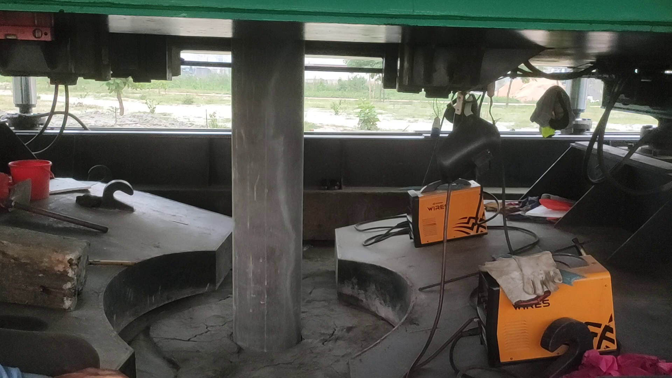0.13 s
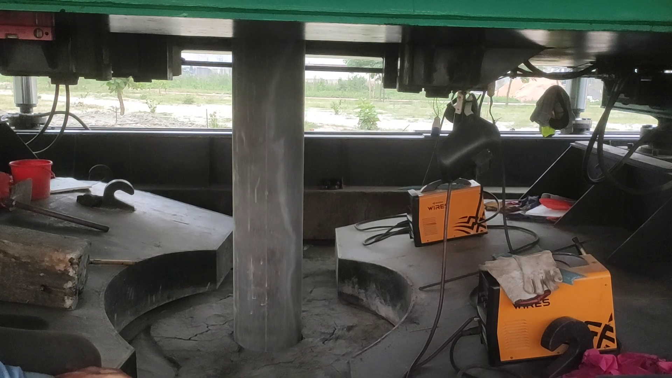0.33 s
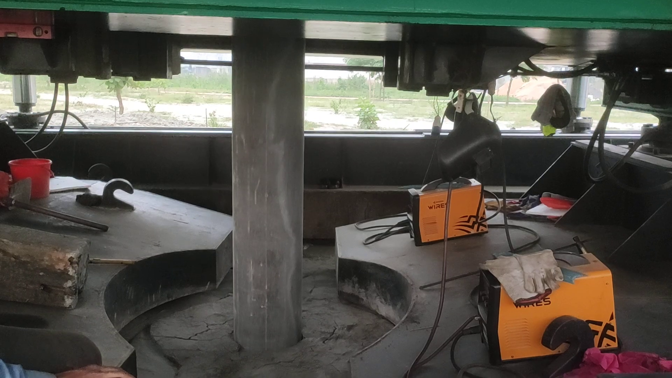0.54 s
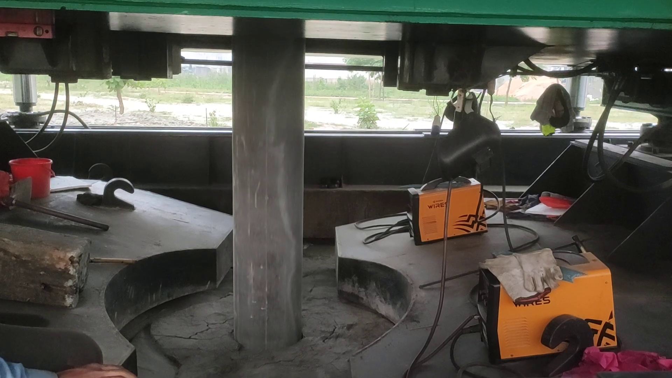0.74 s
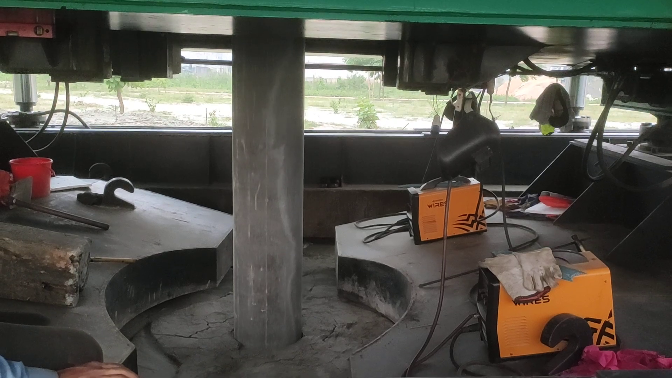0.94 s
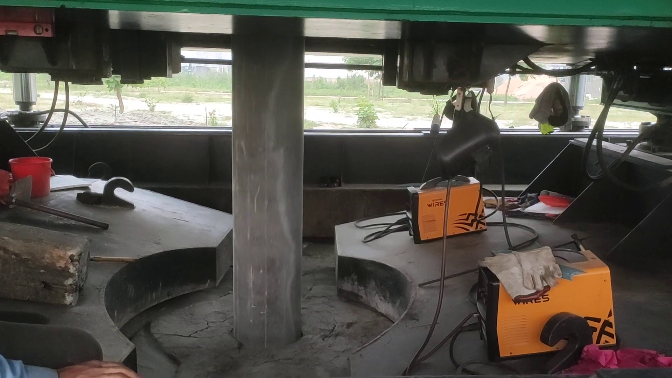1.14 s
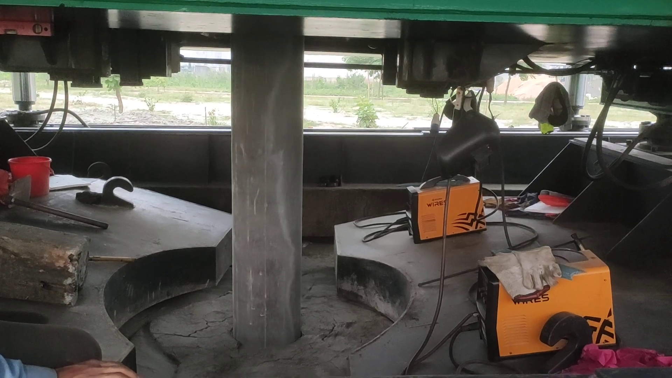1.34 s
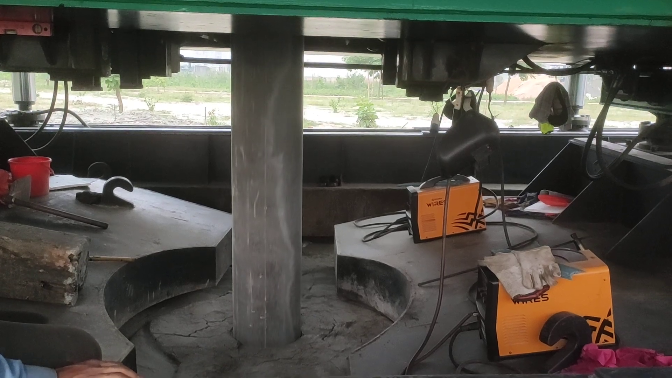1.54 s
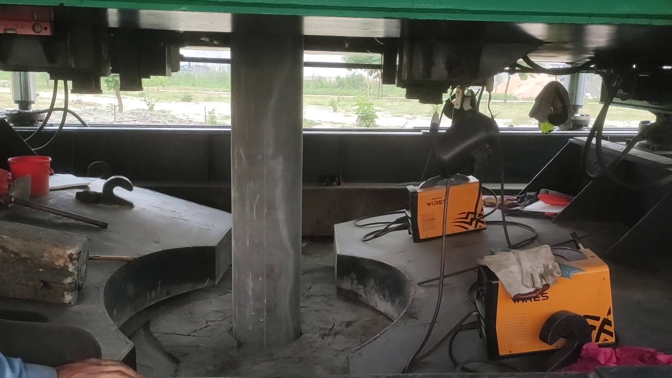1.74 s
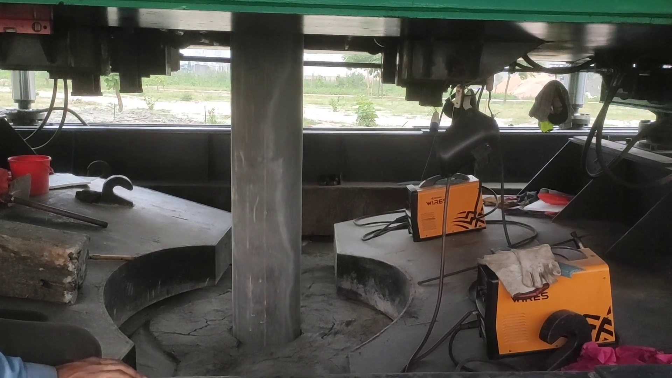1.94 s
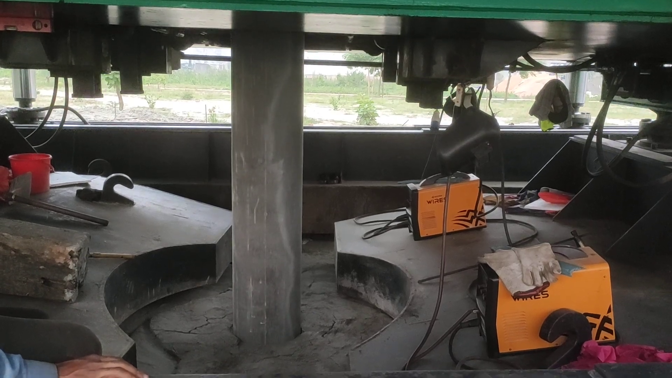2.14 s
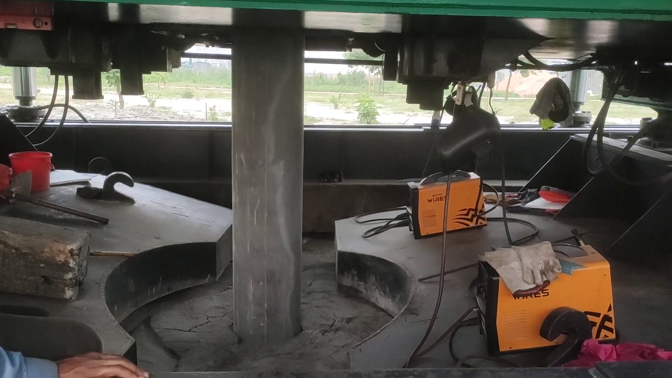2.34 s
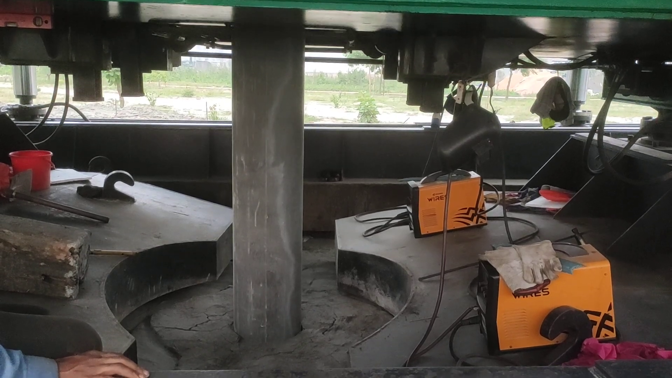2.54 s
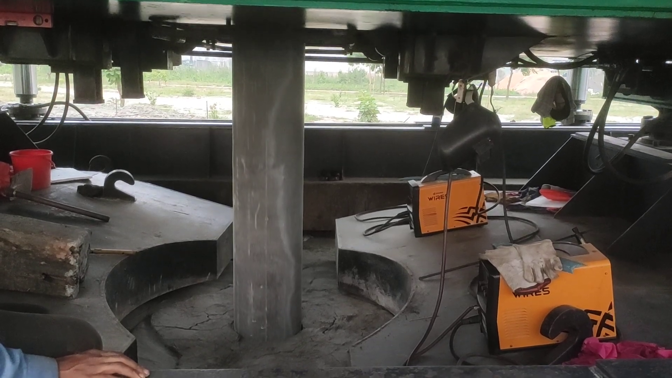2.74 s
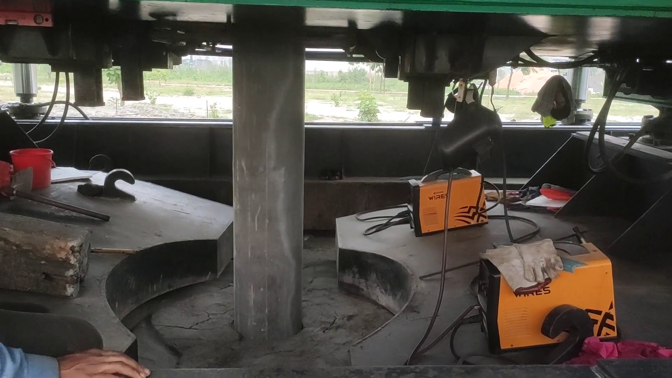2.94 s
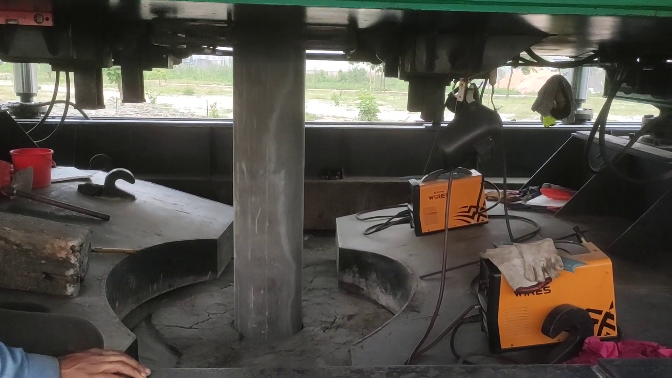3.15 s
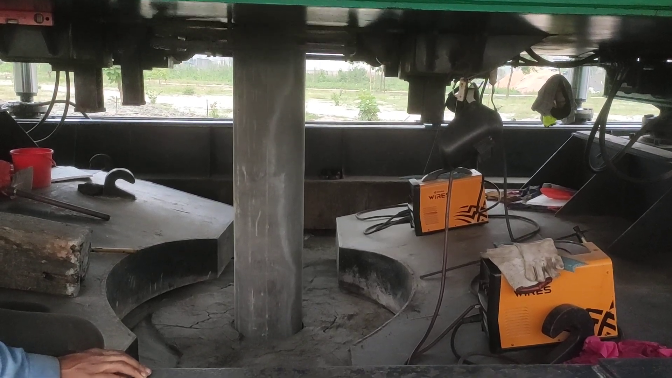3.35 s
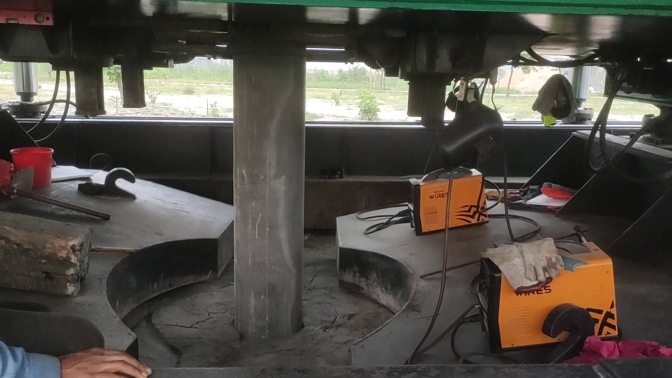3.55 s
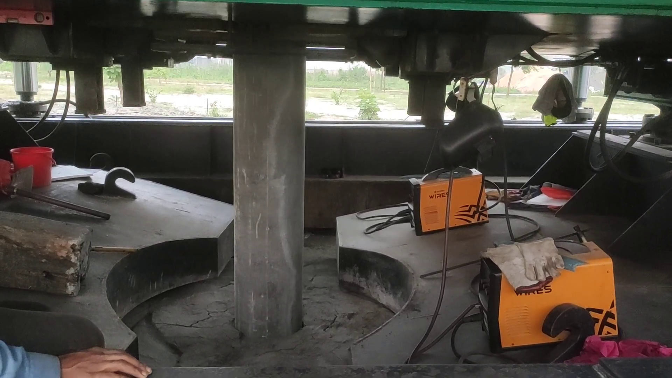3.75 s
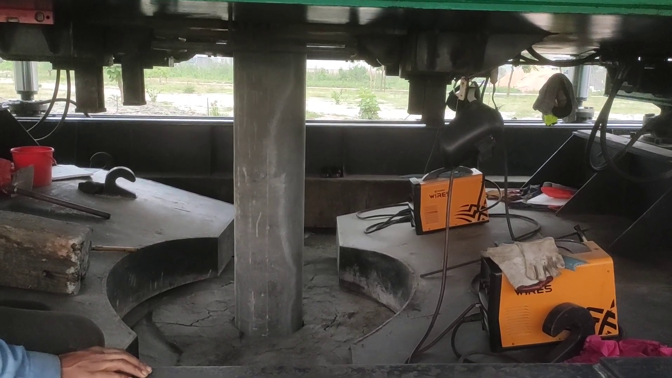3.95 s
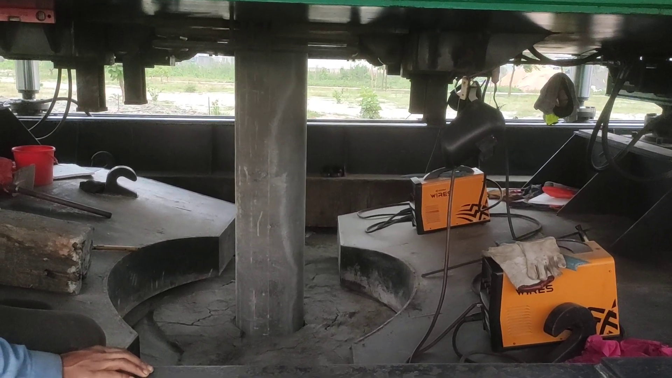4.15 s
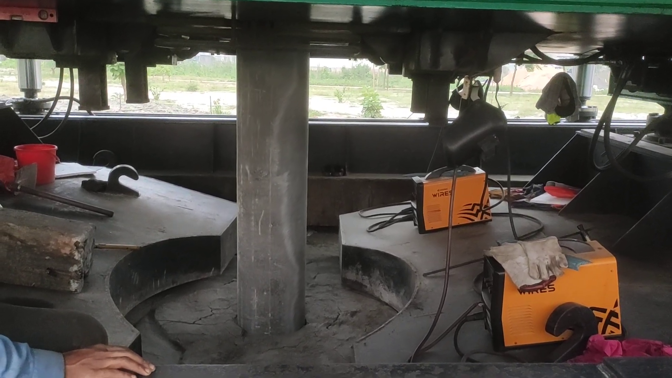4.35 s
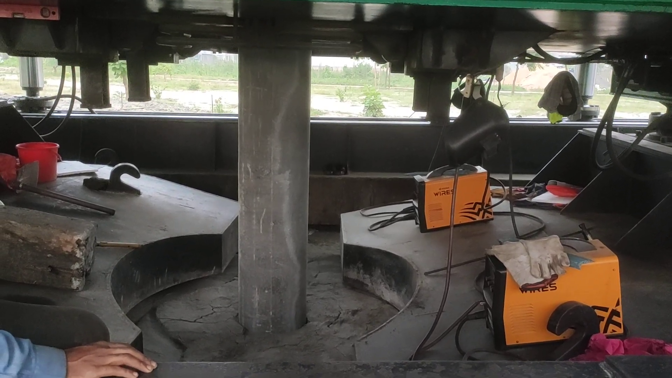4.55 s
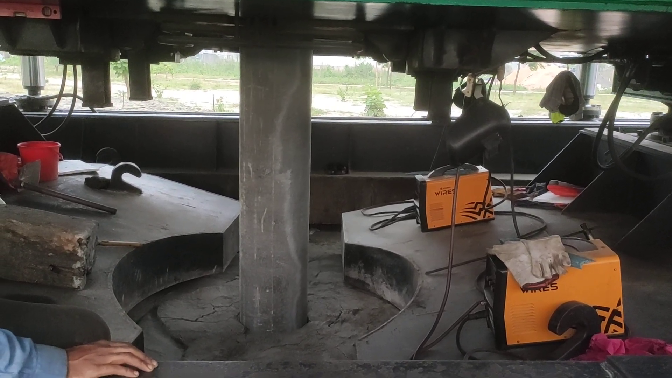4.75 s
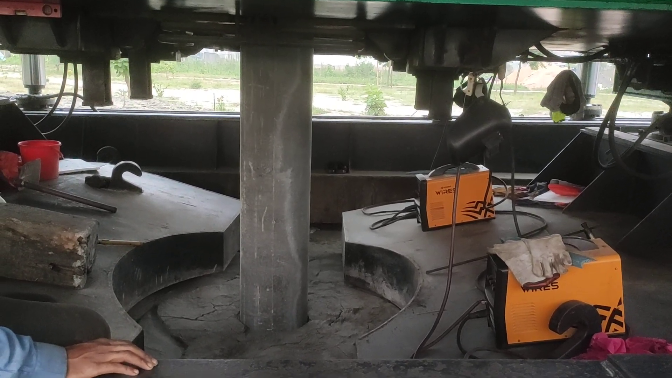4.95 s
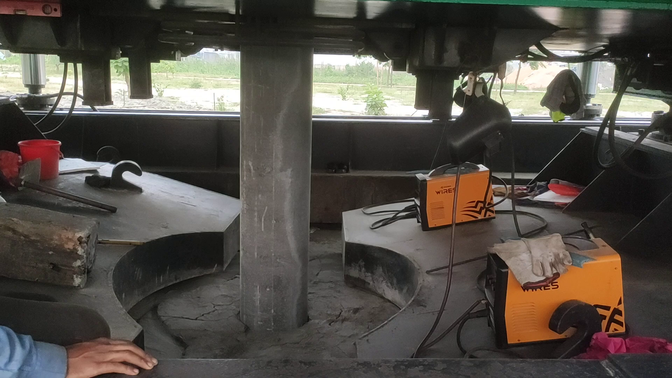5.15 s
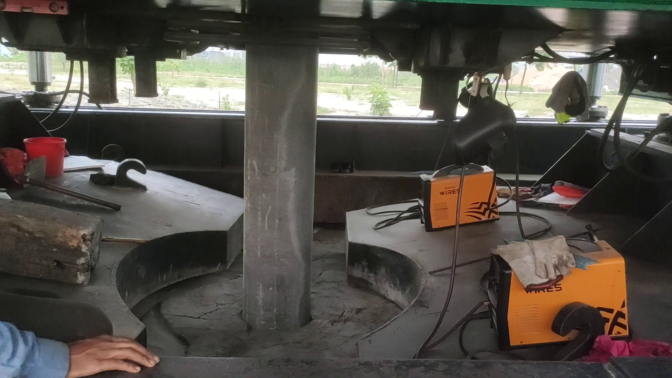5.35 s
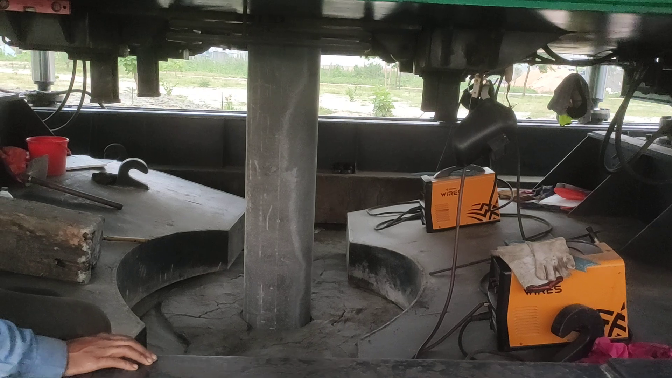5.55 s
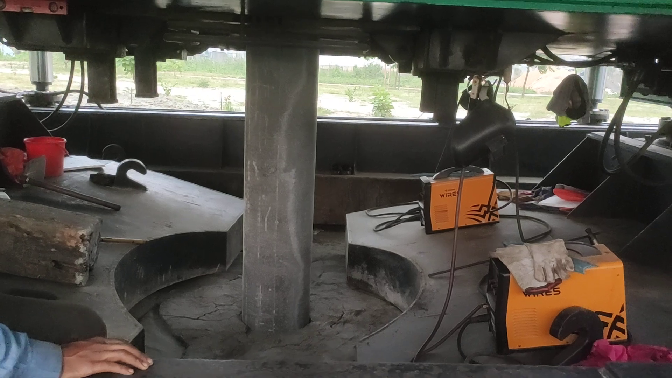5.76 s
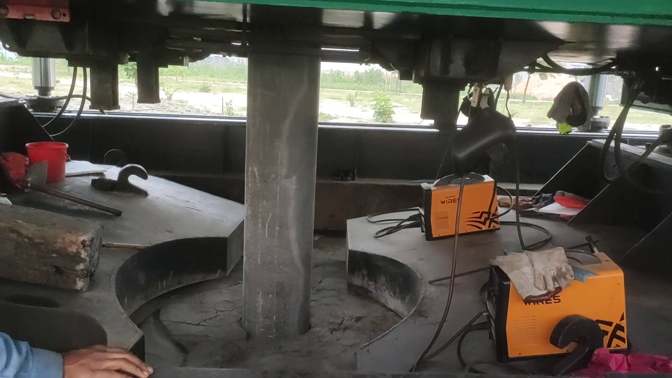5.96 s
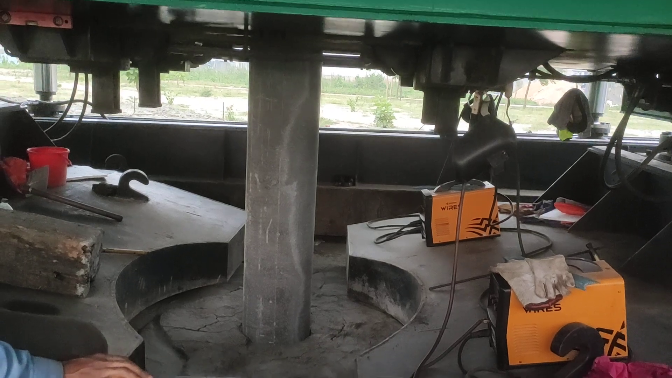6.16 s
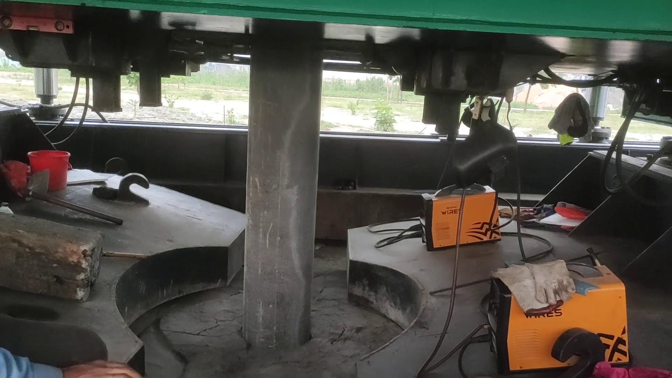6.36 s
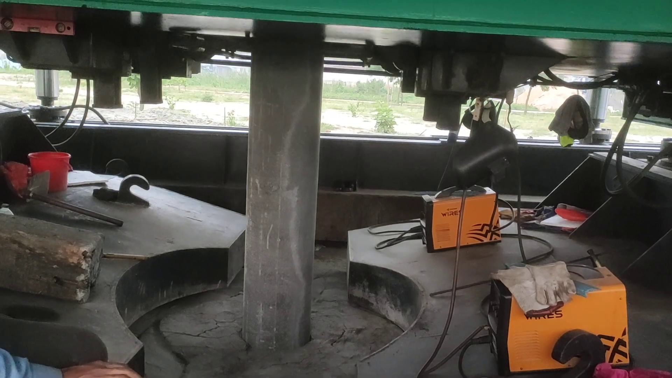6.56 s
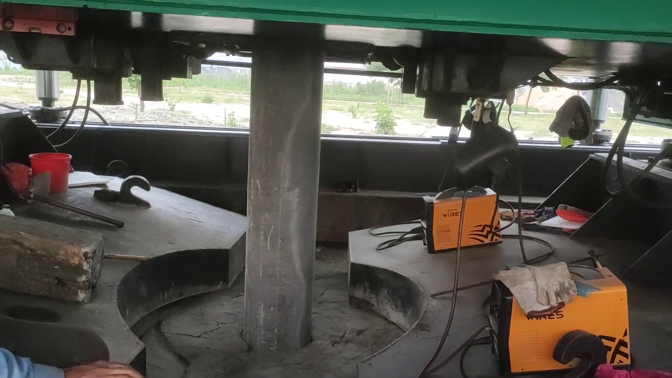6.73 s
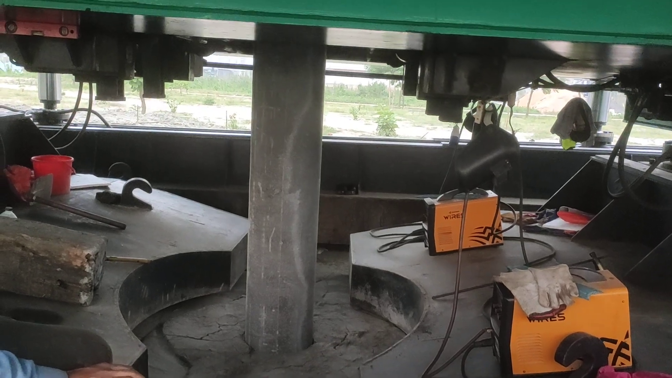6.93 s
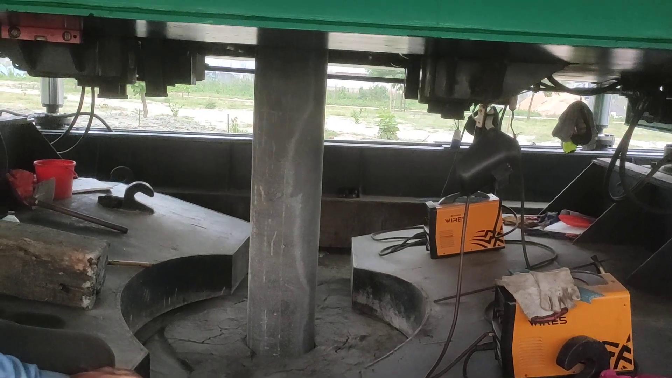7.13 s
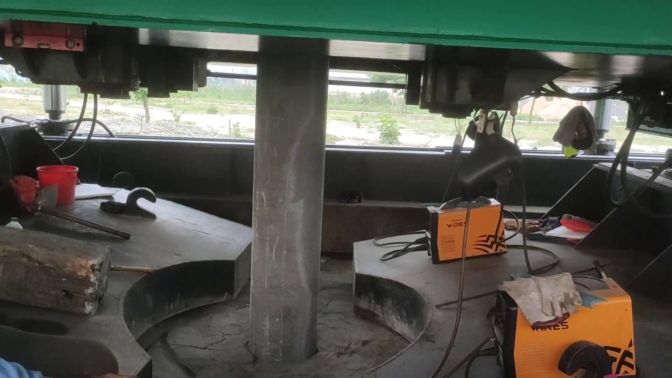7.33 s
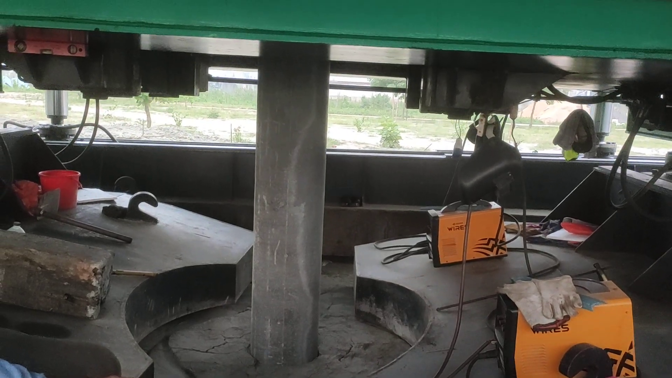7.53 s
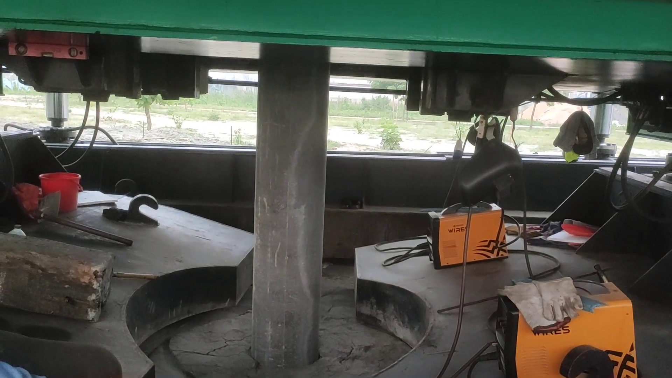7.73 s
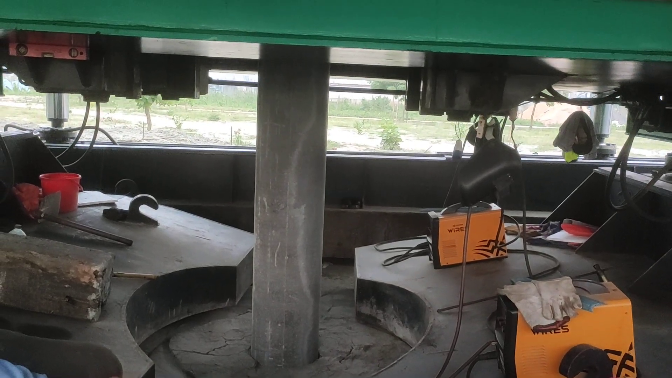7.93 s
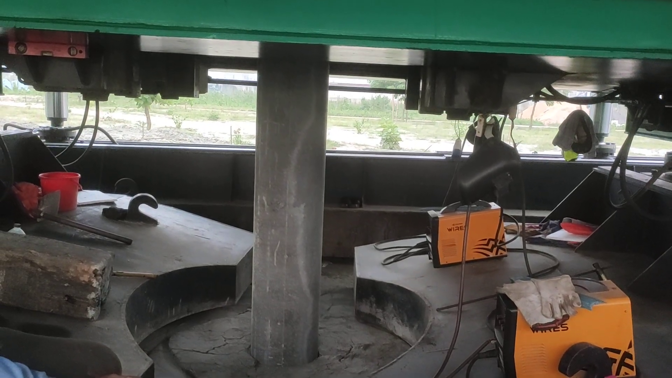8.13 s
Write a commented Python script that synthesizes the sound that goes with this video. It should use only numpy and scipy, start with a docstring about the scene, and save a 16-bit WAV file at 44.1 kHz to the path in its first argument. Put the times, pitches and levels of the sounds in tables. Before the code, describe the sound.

Close under a steel deck, a hydraulic machine hums loud and steady, diesel clatter and rushing oil beneath it. Midway a hard booming clank shakes the frame and the hum drops back, wavering. Later come a shrill squeak, a short grinding groan, a few knocks and thuds while the pitch hunts; then the hum settles again. Steady microphone hiss throughout.

```python
"""Hydraulic pile press under load

Heard under the steel deck: the piston pumps hum as harmonics of their stroke rate, which swell and fade.
The diesel engine repeats one uneven clatter every turn of the shaft; oil rushes and hisses as coloured noise.
Midway the load shifts: the shared speed hunts, the oil surges, and decaying modes and noise jolt the frame.
The pile grinds in runs of ringing slips, grit crumbles, steel squeaks and knocks; then the hum settles.
A steady microphone hiss lies under it all."""
import sys
import numpy as np
from scipy import signal
from scipy.fft import rfft, irfft, next_fast_len
from scipy.io import wavfile
from scipy.ndimage import uniform_filter1d, minimum_filter1d

SR = 44100
rng = np.random.default_rng(int(sys.argv[2]) if len(sys.argv) > 2 else 0)


def to_wav(sig):
    """Store sig (one row per channel, or 1-D mono) as 16-bit WAV at the path in sys.argv[1].

    Samples outside -1..1 are clipped; the rate is SR.
    """
    pcm = np.clip(np.atleast_2d(sig), -1, 1) * 32767
    pcm = np.round(pcm).astype(np.int16)
    wavfile.write(sys.argv[1], SR, pcm.T)  # frames by channels


N = 365588
START_S, EDGE_HZ = 0.338, 15000  # sound starts; upper band limit
PISTONS = 7  # strokes per turn of the shaft
# load drops off, load comes back, engine stops hunting; each change takes SHIFT_S
SLACK_FROM_S, SLACK_TO_S, SETTLE_S, SHIFT_S = 3.63, 5.246, 6.91, 0.29

# Pump speed. Each row: time in seconds, piston strokes per second.
STROKE_RATE = [(0.34, 173.7), (3.62, 173.5), (3.7, 172.3), (3.75, 175), (3.825, 182), (3.89, 176.5),
               (3.97, 174.6), (4.15, 174.5), (4.3, 176.3), (4.48, 175.3), (4.8, 176.1), (5.17, 175.8),
               (5.33, 173.3), (5.5, 164.3), (5.57, 162.3), (5.68, 165.7), (5.86, 171.4), (6.02, 170.8),
               (6.2, 171.6), (6.3, 175), (6.39, 179.4), (6.47, 178), (6.53, 171), (6.59, 167),
               (6.74, 175.2), (6.83, 174.3), (6.95, 171.8), (7.2, 172.5), (8.29, 173.4)]
# Unsteadiness of the oil flow. Each row: time in seconds, unrest from 0 to 1.
UNREST = [(0.34, 0), (3.6, 0.15), (3.8, 0.65), (4.15, 0.9), (4.35, 0.58), (5.2, 0.42), (5.55, 0.46),
          (5.95, 0.2), (6.35, 0.65), (6.8, 0.23), (7.3, 0), (8.29, 0.04)]

# Port likeness for noise. Each row: frequency in Hz, correlation (clipped to -1..1).
PORT_LIKENESS = [(30, 0.6), (80, 2.5), (380, 0.5), (450, 0.27), (700, 1.15), (1000, 0.53), (1600, 0.95),
                 (3000, 0.04), (6000, -0.17)]
# Port phase for noise. Each row: frequency in Hz, left lead in radians.
NOISE_LEAD = [(30, -.1), (150, -.15), (350, -.35), (700, -.6), (1100, -1.2), (1600, -2), (3000, -3.8),
              (6000, -7.6)]
# Port balance for noise. Each row: frequency in Hz, left minus right in dB.
NOISE_BALANCE = [(60, 1.0), (100, 0.6), (170, 0.67), (280, 1.4), (470, 1), (780, 0.25), (1300, 1.7),
                 (2180, 11), (3640, 7), (6080, 1.6)]
# Port phase for tones. Each row: frequency in Hz, left lead in radians.
TONE_LEAD = [(170, -.1), (345, -.47), (520, -.3), (690, -.1), (870, -1.1), (1040, -1.1), (1215, -.1),
             (1390, 1.1), (1560, -2.6), (1810, -2.8), (2080, -.9), (2255, -3), (2285, -1.2), (2600, -2.3),
             (2950, -.6), (3300, .4), (3800, .9)]
# Port balance for tones, before and after the microphone moves.
# Each row: frequency in Hz, left minus right in dB.
EARLY_TONE_BALANCE = [(170, 1.5), (345, 2.5), (520, -2), (690, -0.5), (870, 1), (1040, 0.5), (1215, -0.5),
                      (1390, 11.5), (1560, 18), (1750, 7), (2100, 5.5), (4000, 1)]
LATE_TONE_BALANCE = [(170, 1), (345, 2.5), (520, -2.5), (690, -1), (870, 0.5), (1040, 6.5), (1215, -2),
                     (1390, 10.5), (1560, 12), (1750, 11.5), (2100, -2), (4000, 3)]

# Noise spectra: frame rumble, oil rush, valve hiss, steady microphone hiss.
# Each row: frequency in Hz, relative density in dB per Hz.
RUMBLE_SPECTRUM = [(15, -12.5), (30, 2), (45, -1), (85, 4), (130, -1), (200, -4.5), (280, -6), (450, -21),
                   (1200, -62.5), (6000, -100)]
RUSH_SPECTRUM = [(60, -22), (150, 3), (280, -7), (390, 4.5), (470, -9), (620, -0.5), (850, -3.5),
                 (1100, -6), (1350, -12), (1490, -20.5), (1750, -17), (2300, -38), (4000, -54.5),
                 (9000, -80)]
HISS_SPECTRUM = [(1000, -8.5), (1800, -1.5), (2300, 2.5), (2900, -3), (3600, -1.5), (4400, -4), (5300, -7),
                 (6100, -11.5), (7000, -18.5), (8500, -24.5), (10000, -27.5), (13000, -37.5),
                 (15000, -45.5)]
MICROPHONE_SPECTRUM = [(5000, -20), (7000, 0), (9800, 0.5), (13000, -4), (15000, -9.5)]
# Oil surges. Each row: peak time in seconds, rise in seconds, decay in seconds,
# rumble level in dB, rush level in dB, hiss level in dB.
SURGES = [(3.7, 0.027, 0.071, -18, -27.5, -64), (3.903, 0.011, 0.033, -13, -13, -32),
          (3.97, 0.076, 0.15, -11.5, -27.5, -64), (5.6, 0.17, 0.068, -24.5, -20.5, -38),
          (5.9, 0.23, .35, -33, -47, -46.5), (6.33, 0.083, 0.12, -27, -25, -48.5),
          (6.45, 0.057, 0.26, -23.5, -34, -58.5), (7.08, 0.094, 0.25, -28, -24, -56)]

# Grit spectrum. Each row: frequency in Hz, relative density in dB per Hz.
GRIT_SPECTRUM = [(2000, -27.5), (5000, 1), (9000, -10.5), (12500, -13.5), (15000, -24.5)]
# Spills of grit. Each row: peak time in seconds, level in dB, half length in seconds.
SPILLS = [(3.684, -53, 0.047), (3.834, -53, 0.057), (4.296, -55.5, 0.045), (5.37, -58.5, 0.061),
          (5.514, -62, 0.13), (6.342, -57.5, 0.11)]

# Steel knocks. Each row: start in seconds, relative level in dB, clatter t60 in seconds,
# clatter tilt in dB per octave.
KNOCKS = [(3.889, -20.5, .28, 0), (3.905, -24, .22, 1), (3.925, -29, .2, 0), (4.475, -31, .06, .5),
          (4.977, -33, .07, -3), (5.485, -36, .06, 6), (5.958, -17.5, .075, -2.2), (6.287, -19, .075, -3.5),
          (7.209, -33, .08, -1), (7.792, -38, .08, 0)]
# Modes of the struck steel. Each row: frequency in Hz, relative level in dB, t60 in seconds.
STEEL_MODES = [(2270, 3, 0.13), (2500, 4, .1), (2780, -3, .07), (3375, -5, .13), (4250, -10, .13),
               (4560, -10, .13), (7400, -25, .15)]
# Clatter spectrum. Each row: frequency in Hz, relative density in dB per Hz.
CLATTER_SPECTRUM = [(500, -10), (1500, -3), (2400, 0), (3500, -2), (4600, 1), (5400, -3.5), (6500, -15),
                    (8000, -20), (11500, -27), (12500, -42), (15000, -54)]

# Frame jolts. Each row: start in seconds, relative level in dB, t60 in seconds, tilt in dB per octave.
JOLTS = [(3.712, -18, .15, -2), (3.88, -12, .25, -4), (3.893, -2.5, 0.24, 3.5), (3.91, -7, .16, 5),
         (3.932, -9, 0.15, 0), (3.966, -8.5, .13, 4), (4.083, -18, .16, -2), (6.214, -20, 0.3, -10),
         (6.241, -12, .22, -9), (6.289, -15, 0.3, -9), (6.474, -19, .14, -4)]
# Frame modes. Each row: frequency in Hz, relative level in dB.
FRAME_MODES = [(42, -4.5), (79, -6.5), (104, -1), (153, 3), (220, -2), (259, -4)]
# Shudder spectrum. Each row: frequency in Hz, relative density in dB per Hz.
THUD_SPECTRUM = [(20, -19.5), (40, -9), (70, 24), (120, -3.5), (240, -2.5), (400, -1), (800, -17),
                 (1500, -37), (4000, -57.5), (10000, -87)]

# Squeaks. Each row: start in seconds, length in seconds, relative level in dB.
SQUEAKS = [(5.316, .035, -43), (5.345, 0.047, -32.5), (5.385, 0.044, -35.5), (5.434, .027, -42),
           (5.468, .02, -48)]
# Squeak partials. Each row: multiple of the pitch, relative level in dB.
SQUEAK_PARTIALS = [(1, 3), (2, -19)]

# Grinds in the clamp. Each row: peak time in seconds, relative level in dB, half length in seconds.
GRINDS = [(5.5, -27, .04), (5.557, -19, .026), (5.605, -16, .028), (6.31, -25, .022), (6.355, -23.5, .022)]
# Modes of the clamp jaws. Each row: frequency in Hz, relative level in dB, t60 in seconds.
JAW_MODES = [(496, -2, 0.11), (623, 17, 0.055), (790, -14, 0.029), (940, -18, .025), (1130, -24, 0.032),
             (1900, -20, .08)]
# Rasp of the slips. Each row: frequency in Hz, relative density in dB per Hz.
RASP_SPECTRUM = [(150, -10), (600, 0), (1100, -2), (1900, -17), (5000, -27), (7000, -45), (15000, -68)]

# Engine tones at multiples of the shaft speed. Each row: frequency in Hz, relative level per tone in dB.
ENGINE_TONES = [(25, -53), (75, -42), (170, -50.5), (320, -43.5), (480, -40), (610, -31.5), (720, -47.5),
                (830, -40.5), (1000, -42.5), (1200, -43), (1450, -54.5), (1620, -53), (1760, -58),
                (2300, -67), (3200, -73), (4000, -73.5), (5500, -80.5), (8000, -105)]
# Multiples that stand out. Each row: multiple of the shaft speed (rounded for the pitch),
# relative level in dB at first, relative level in dB once settled.
STRONG_ORDERS = [(3, -39.5, -39), (6, -43.5, -42), (12, -36, -38.5), (16.3, -49.5, -46), (17, -39.5, -30),
                 (21.9, -34.5, -42.5), (23, -33, -37.5), (25, -32.5, -39.5), (26.1, -35, -44),
                 (31, -34, -35.5), (46, -47, -48.5), (54.6, -52.5, -47), (59.6, -44, -46.5),
                 (67.15, -48, -60.5), (74.1, -57.5, -56), (91.9, -55.5, -63.5)]

# Main hum, the second pump harmonic. Each row: time in seconds, level in dB before flutter.
HUM = [(0.34, -10), (3.6, -13), (3.76, -16), (3.83, -27), (3.92, -13), (4.0, -20.5), (5.05, -27),
       (5.45, -16.5), (5.51, -24), (5.555, -13), (5.68, -16), (5.74, -22), (5.79, -11), (6.13, -12),
       (6.25, -20.5), (6.31, -15.5), (6.5, -17.5), (6.555, -21), (6.63, -16), (6.89, -13), (7.02, -24.5),
       (7.12, -20.5), (7.25, -14.5), (8.29, -16)]
# Strong pump tones. Each row: harmonic, then base level in dB at first, while slack,
# while the engine hunts, once settled.
PUMP_TONES = [(1, -22, -27.5, -23.5, -26.5), (3, -20, -34.5, -28, -26), (4, -25, -28, -27, -27.5),
              (5, -31.5, -31, -26, -24.5), (6, -29.5, -40.5, -33, -26), (7, -38, -35, -37.5, -32),
              (8, -33, -43.5, -36, -29.5), (9, -38, -42, -51, -39.5)]
# Weaker upper pump tones, which wander slowly. Each row: harmonic, base level in dB.
OVERTONES = [(10, -51), (11, -53.5), (12, -53), (13, -55.5), (15, -60), (16, -64.5), (17, -64), (19, -61.5),
             (20, -66), (21, -60.5), (22, -65)]
# Swells and fades. Each row: middle in seconds, harmonic, change in dB, half length in seconds.
SWELLS = [(0.75, 3, -3.5, 1), (5.397, 3, 10.5, 0.083), (5.757, 3, 2.5, 0.056), (6.413, 3, 3, .05),
          (6.803, 3, -2.5, 0.06), (7.075, 3, 3, 0.09), (7.755, 3, -22, 0.25), (0.527, 4, -8, 0.12),
          (3.652, 4, -5.5, 0.4), (5.0, 4, 1, 0.34), (5.42, 4, -15, 0.062), (5.685, 4, 9.5, 0.034),
          (5.84, 4, -7, 0.072), (6.238, 4, 6.5, 0.0424), (7.302, 4, -17, 0.38), (2.093, 5, 6, 0.46),
          (.45, 5, -2.5, .2), (1.398, 7, -3, .2), (3.907, 5, 4, 0.033), (5.389, 5, 13.5, 0.04),
          (5.57, 5, -3, .08), (5.801, 5, 6, 0.04), (6.05, 5, 4.5, 0.069), (6.2, 5, -16.5, .05),
          (6.82, 5, -4, 0.052), (7.607, 5, -15.5, 0.23), (8.2, 5, 3, 0.13), (0.45, 6, 6, 0.86),
          (4.06, 6, 7, .04), (4.35, 6, -3, .1), (5.45, 6, 8, .06), (6.0, 6, 3, 0.16), (6.8, 6, -8, 0.041),
          (7.301, 6, 1.5, 0.27), (.7, 7, 6, 0.75), (4.203, 7, 3, 0.045), (4.33, 7, -10, 0.058),
          (4.8, 7, -5.5, .15), (6.42, 7, 6, 0.047), (6.773, 7, 12.5, 0.1), (7.854, 7, -6, 0.15),
          (3.4, 8, 4.5, 0.54), (4.466, 8, 11, .07), (4.886, 8, -8, 0.17), (5.25, 8, 12, 0.099),
          (5.4, 8, 7, 0.028), (5.597, 8, -2, 0.14), (6.423, 8, 2, 0.085), (6.723, 8, 5.5, 0.089),
          (7.08, 8, -17, 0.025), (7.396, 8, 0, .2), (1.844, 9, 7, 0.27), (2.7, 9, -12, 0.84),
          (7.145, 9, -8, 0.29), (.6, 11, -4.5, 0.27), (1.796, 11, 4, 0.64), (1.2, 12, 4.5, 0.25),
          (3.053, 12, 7, 0.35), (6.1, 12, 8, 0.18), (2.597, 13, 1.5, 0.36), (6.402, 13, 10, 0.27),
          (1.1, 19, -8, .2), (2.1, 19, -5, .2), (2.8, 19, 0, .35)]

T = np.arange(N) / SR


def gain_of(db):
    """Decibels to amplitude."""
    return 10 ** (np.asarray(db) / 20)


def evened(x):
    """Scales to rms 1."""
    return x / np.sqrt(np.mean(x ** 2) + 1e-20)


def read(points, hz):
    """Interpolates a table on a log-frequency axis."""
    f, value = np.transpose(points)
    return np.interp(np.log(hz + 1), np.log(f + 1), value)


def curves(rows):
    """One curve over the whole time for each column after the first."""
    s, *columns = np.transpose(rows)
    return [np.interp(T, s, c) for c in columns]


def bell(s, half_s):
    """Smooth rise to 1 at time s and the same fall; 1/e at half_s."""
    return np.exp(-np.minimum(((T - s) / half_s) ** 2, 40))


def add(mix, s, sound):
    """Mixes a stereo sound in at time s."""
    part = mix[:, round(s * SR):][:, :sound.shape[1]]
    part += sound[:, :part.shape[1]]


def drift(rate_hz):
    """Slow random curve, low-passed near rate_hz, of about rms 1."""
    hz = np.fft.rfftfreq(2048, T[-1] / 2048)
    white = rfft(rng.standard_normal(2 * len(hz) - 2))
    slow = irfft(white / (1 + (hz / rate_hz) ** 4))
    return np.interp(T, np.linspace(0, T[-1], len(slow)), evened(slow))


def noise(spectrum, size=N, tilt_db=0):
    """Coloured noise of rms 1 at two partly coherent ports, reaching the right one first."""
    padded = next_fast_len(size + size % 2, True)
    hz = np.fft.rfftfreq(padded, 1 / SR)
    a, b = rng.standard_normal((2, len(hz))) + 1j * rng.standard_normal((2, len(hz)))
    same = np.clip(read(PORT_LIKENESS, hz), -1, 1)
    side = gain_of(read(NOISE_BALANCE, hz) / 2)
    left = a * side * np.exp(1j * read(NOISE_LEAD, hz))
    right = (same * a + np.sqrt(1 - same ** 2) * b) / side
    colour = gain_of(read(spectrum, hz) + tilt_db * np.log2(hz + 1))
    return evened(irfft(np.array([left, right]) * colour, padded)[:, :size])


def whistle(hz, width_hz):
    """Stereo noise of rms 1 in one narrow resonance."""
    padded = next_fast_len(N, True)
    f = np.fft.rfftfreq(padded, 1 / SR)
    z = rng.standard_normal((2, len(f))) + 1j * rng.standard_normal((2, len(f)))
    return evened(irfft(z / (1 + ((f - hz) / width_hz) ** 2), padded)[:, :N])


def tone(angle, level, hz):
    """Partial with its standing wave's lead and balance at the ports; the microphone moves late on."""
    moved = np.clip((T - 5.5) / 1.5, 0, 1)
    half_lead = read(TONE_LEAD, hz) / 2
    balance_db = read(EARLY_TONE_BALANCE, hz) * (1 - moved) + read(LATE_TONE_BALANCE, hz) * moved
    side = gain_of(balance_db / 2)
    angle = angle + rng.uniform(0, 2 * np.pi)
    ports = np.array([side * np.cos(angle + half_lead), np.cos(angle - half_lead) / side])
    return 2 * level * ports / np.hypot(side, 1 / side)  # level is the rms over both ports


def shifted():
    """Goes from 0 to 1 as the load shifts."""
    return np.clip((T - SLACK_FROM_S) / SHIFT_S, 0, 1)


def slack():
    """Is 1 while the pumps run with little load."""
    return shifted() - np.clip((T - SLACK_TO_S) / SHIFT_S, 0, 1)


def settled():
    """Goes from 0 to 1 as the engine stops hunting."""
    return np.clip((T - SETTLE_S) / SHIFT_S, 0, 1)


def microphone_hiss(level_db=-65.5):
    """Steady high hiss of the microphone."""
    return gain_of(level_db) * noise(MICROPHONE_SPECTRUM)


def drone(level_db=-32, pitch_hz=260, width_hz=16):
    """While the load is slack, the frame drones at one of its modes, alike at both ports."""
    return gain_of(level_db) * slack() * whistle(pitch_hz, width_hz)[0]


def flow():
    """Gains of rumble, rush and hiss: a steady flow set by the load, plus surges added as power."""
    base_db = np.c_[[-31.5, -29, -48]]
    slack_db, late_db = np.c_[[3.0, -2, -0.5]], np.c_[[0.5, 0, 0]]
    power = gain_of(base_db + slack_db * slack() + late_db * shifted()) ** 2
    for s, rise_s, decay_s, *db in SURGES:
        away = np.maximum((s - T) / rise_s, (T - s) / decay_s)
        power += (gain_of(np.c_[db]) * np.exp(-np.minimum(away, 20))) ** 2
    return np.sqrt(power)


def oil(angle, unrest, rush_db=2, surge_db=6, gusty_db=-2.6, flicker_db=1.0):
    """Turbulent oil rushes and hisses in time with the pistons and shakes the frame."""
    rumble, rush, hiss = flow()
    gusts_db = gusty_db * unrest * drift(23)
    stroke = np.cos(angle)
    out = noise(RUMBLE_SPECTRUM) * rumble * gain_of(gusts_db)
    rush_gain = rush * gain_of(rush_db + surge_db * np.sqrt(unrest) + gusts_db)
    out += noise(RUSH_SPECTRUM) * rush_gain * (1 + 0.52 * stroke)
    hiss_gain = hiss * gain_of(flicker_db * drift(50))
    return out + noise(HISS_SPECTRUM) * hiss_gain * (1 + 0.27 * stroke)


def valves(first_db=-76, later_db=-64, upper_db=-8, sizzle_db=-61):
    """Oil whistles thinly through a valve: one tone until the load shifts, two lower with a sizzle late on."""
    before = np.clip((3.8 - T) / .2, 0, 1)
    after = np.clip((T - 6.6) / .5, 0, 1)
    pair = whistle(5700, 22) + gain_of(upper_db) * whistle(7320, 35)
    later = gain_of(later_db) * pair + gain_of(sizzle_db) * whistle(5500, 600)
    return gain_of(first_db) * before * whistle(9900, 70) + after * later


def grit(grainy_db=4):
    """Grit crumbles in short spills of grainy noise as the pile shifts."""
    level = sum(gain_of(db) * bell(s, half_s) for s, db, half_s in SPILLS)
    return noise(GRIT_SPECTRUM) * level * evened(gain_of(grainy_db * drift(90)))


def knocks(clatter_db=-8.5, ring_db=-19, crack=0.47, crack_s=0.0014):
    """Steel strikes steel: a crack, a short noisy clatter and a little modal ring."""
    out, t = np.zeros((2, N)), np.arange(SR // 2) / SR
    for s, db, t60, tilt_db in KNOCKS:
        decay = gain_of(-60 * t / t60) + crack * np.exp(-t / crack_s)
        clatter = noise(CLATTER_SPECTRUM, size=len(t), tilt_db=tilt_db) * decay
        ring = np.zeros((2, len(t)))
        for hz, mode_db, mode_t60 in STEEL_MODES:
            phase = 2 * np.pi * (hz * t + rng.random((2, 1)))
            ring += gain_of(mode_db - 60 * t / mode_t60) * np.sin(phase)
        add(out, s, gain_of(db) * (gain_of(clatter_db) * clatter + gain_of(ring_db) * ring))
    return out


def jolts(shudder_db=-2, rise_s=0.00053):
    """A shift of the load sets the heavy frame shuddering (noise) and booming (modes)."""
    out, t = np.zeros((2, N)), np.arange(SR // 2) / SR
    for s, db, t60, tilt_db in JOLTS:
        boom = np.zeros(len(t))
        for hz, mode_db in FRAME_MODES:
            mode = np.sin(2 * np.pi * (hz * t + rng.random()))
            boom += gain_of(mode_db + tilt_db * np.log2(hz)) * mode
        shudder = noise(THUD_SPECTRUM, size=len(t), tilt_db=tilt_db)
        body = gain_of(shudder_db) * shudder + evened(boom)
        add(out, s, body * gain_of(db - 60 * t / t60) * (1 - np.exp(-t / rise_s)))
    return out


def squeak(pitch_hz=3400, jitter=.016, jitter_s=.0012, rough_db=2.0, bend=0.071, bend_s=0.03,
           edge_s=0.013, lag_rad=1.0):
    """Steel sticks and slips on steel: a shrill, jittery tone bends down onto its pitch in short spurts."""
    level = np.zeros(N)
    for s, length_s, db in SQUEAKS:
        level += gain_of(db) * np.clip(np.minimum(T - s, s + length_s - T) / edge_s, 0, 1)
    since = T - SQUEAKS[0][0]
    pole = np.exp(-1 / (jitter_s * SR))
    slipping = evened(signal.lfilter([1], [1, -pole], rng.standard_normal(N)))
    hz = pitch_hz * (1 + bend * np.clip(1 - since / bend_s, 0, 1) + jitter * slipping)
    angle = 2 * np.pi * np.cumsum(hz) / SR
    lag = lag_rad * np.c_[[0, -1]]  # right port slightly behind
    partials = sum(gain_of(db) * np.sin(round(k) * angle + lag) for k, db in SQUEAK_PARTIALS)
    return level * gain_of(rough_db * drift(110)) * partials


def grinding(slips_per_s=700, uneven_db=2.0, rasp_db=-7.5, rasp_s=0.008, rise_s=0.00088):
    """The pile grinds in the clamp: random uneven slips, each ringing the jaws with a short rasp."""
    t = np.arange(SR // 10) / SR
    slips = (rng.random(N) < slips_per_s / SR) * gain_of(uneven_db * rng.standard_normal(N))
    ring = np.zeros((2, len(t)))
    for hz, db, t60 in JAW_MODES:
        lead = read(NOISE_LEAD, hz) * np.c_[[1, 0]]
        ring += gain_of(db - 60 * t / t60) * np.sin(2 * np.pi * hz * t + lead)
    ring *= (1 - np.exp(-t / rise_s)) ** 2
    groan = evened(signal.oaconvolve(slips[None], ring, axes=1)[:, :N])
    rasp_level = signal.oaconvolve(slips, np.exp(-t / rasp_s))[:N]
    rasp = evened(noise(RASP_SPECTRUM) * rasp_level)
    level = sum(gain_of(db) * bell(s, half_s) for s, db, half_s in GRINDS)
    return (groan + gain_of(rasp_db) * rasp) * level


def engine(angle, stroke_hz, unrest, level_db=-1, uneven_db=3.5, unrest_db=-3, slack_db=-4, size=8192):
    """Each turn of the shaft repeats one uneven clatter; a few of its tones stand out."""
    order = np.arange(size // 2 + 1)
    hz = order * stroke_hz / PISTONS
    strong = np.isin(order, [round(row[0]) for row in STRONG_ORDERS])
    plain = (order % PISTONS > 0) & ~strong  # every seventh belongs to the pumps
    height = gain_of(read(ENGINE_TONES, hz) + uneven_db * rng.standard_normal(len(hz)))
    height = height * plain * (hz < EDGE_HZ)
    phase = rng.uniform(0, 2 * np.pi, len(hz))
    spread = np.arccos(np.clip(read(PORT_LIKENESS, hz), -1, 1))
    lead = read(NOISE_LEAD, hz) + rng.standard_normal(len(hz)) * spread
    turn = irfft(height * np.exp(1j * np.array([phase, phase - lead]))) * size / np.sqrt(2)
    place = angle / (2 * np.pi * PISTONS) % 1 * size
    out = gain_of(level_db) * np.array([np.interp(place, np.arange(size), port) for port in turn])
    calm = settled()
    for k, first_db, later_db in STRONG_ORDERS:
        db = first_db + (later_db - first_db) * calm + unrest_db * unrest
        out += tone(round(k) * angle / PISTONS, gain_of(db), k * stroke_hz / PISTONS)
    return out * gain_of(unrest_db * unrest + slack_db * slack())  # unrest weakens the strong tones twice


def swelling_db(k):
    """How many dB harmonic k has swollen or faded at each moment."""
    return sum(db * bell(s, half_s) for s, harmonic, db, half_s in SWELLS if round(harmonic) == round(k))


def pumps(angle, stroke_hz, unrest, flutter_db=3.5, smear_rad=0.55, wander_db=1.5, late_db=-1.5, sink_db=-5):
    """Piston strokes send pressure ripples through the pipes; unsteady flow smears their harmonics."""
    later, idle, calm = shifted(), slack(), settled()
    stages = np.array([1 - later, idle, later - idle - calm, calm])
    tones = [(2, curves(HUM)[0])]
    for k, *db in PUMP_TONES:
        tones.append((round(k), np.array(db) @ stages + swelling_db(k)))
    # overtones wander, and sink after the load shift and in unsteady flow
    for k, db in OVERTONES:
        change_db = wander_db * drift(0.93) + late_db * later + sink_db * unrest
        tones.append((round(k), db + swelling_db(k) + change_db))
    out = np.zeros((2, N))
    for k, db in tones:
        shake = unrest * np.sqrt(min(k, 5) / 2)  # upper tones scatter more than the hum
        level = gain_of(db + flutter_db * shake * drift(16))
        out += tone(k * angle + smear_rad * shake * drift(26), level, k * stroke_hz)
    return out


def scene():
    """Pumps, engine and oil all follow one shaft."""
    stroke_hz = curves(STROKE_RATE)[0]
    unrest = np.clip(curves(UNREST)[0], 0, 1)
    angle = 2 * np.pi * np.cumsum(stroke_hz * (1 + 0.00041 * drift(4))) / SR
    usual_hz = np.median(stroke_hz)
    background = microphone_hiss() + drone() + oil(angle, unrest) + valves()
    impacts = grit() + knocks() + jolts() + squeak() + grinding()
    return background + impacts + engine(angle, usual_hz, unrest) + pumps(angle, usual_hz, unrest)


def record(dry, thump=0.62, settle_s=0.026):
    """The microphone switches on with a soft thump; a limiter holds the loudest peaks; then the band limit."""
    since = np.maximum(T - START_S, 0)
    opening = np.minimum(since / .0005, 1)  # silent before START_S
    pulse = thump * (1 - since / settle_s / 2) * np.exp(-since / settle_s)
    live = (dry - pulse) * opening
    allowed = minimum_filter1d(1 / np.maximum(abs(live).max(0), 1), size=441)
    limited = live * uniform_filter1d(uniform_filter1d(allowed, size=221), size=221)
    lowpass = signal.firwin(511, EDGE_HZ, window=("kaiser", 9), fs=SR)
    return signal.oaconvolve(limited, lowpass[None], "same")


dry = scene()
out = record(dry)
to_wav(out)
```